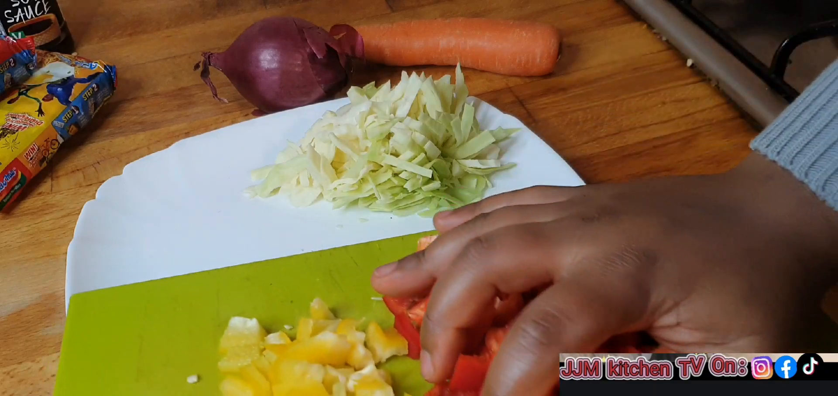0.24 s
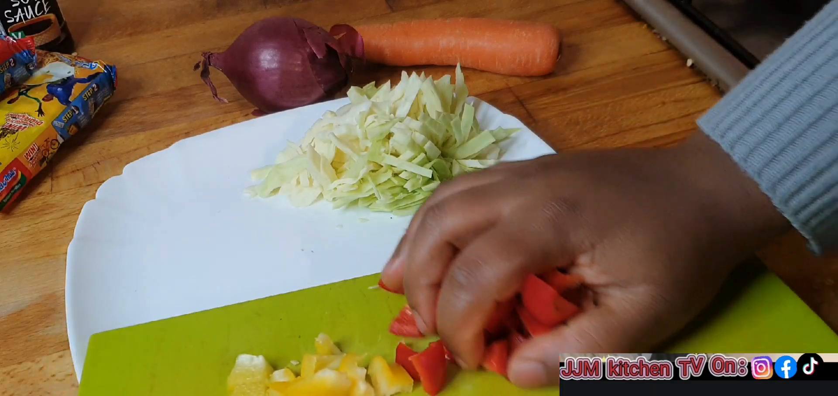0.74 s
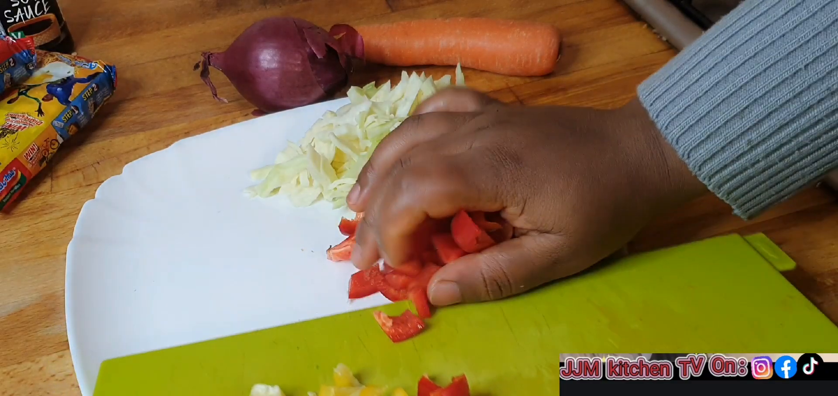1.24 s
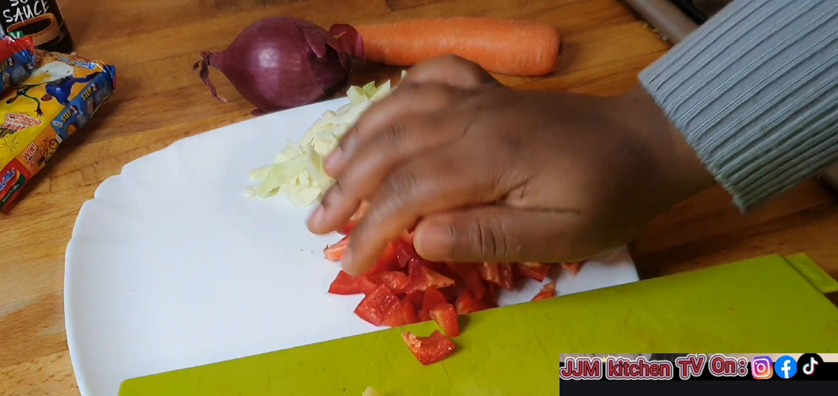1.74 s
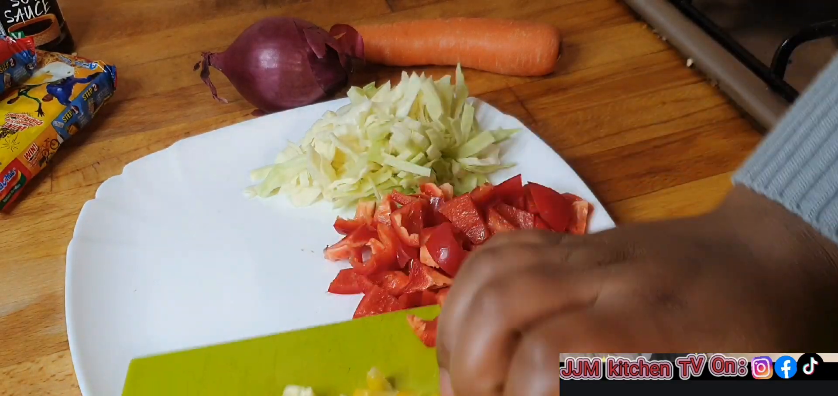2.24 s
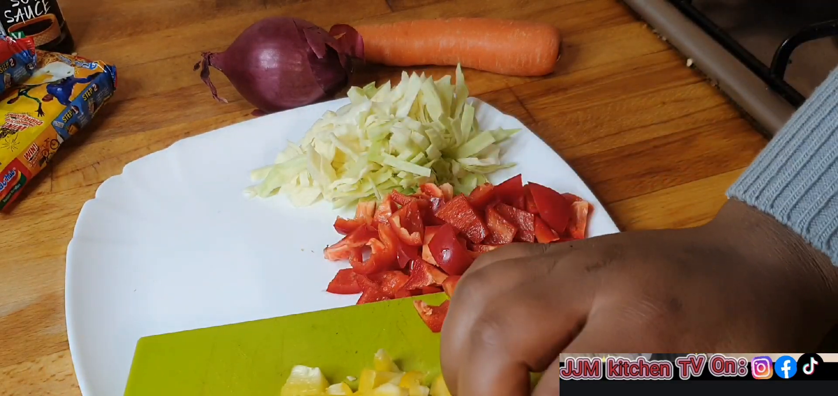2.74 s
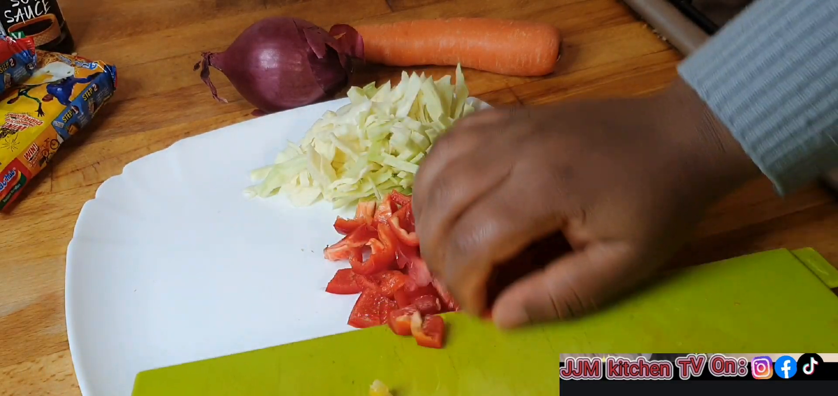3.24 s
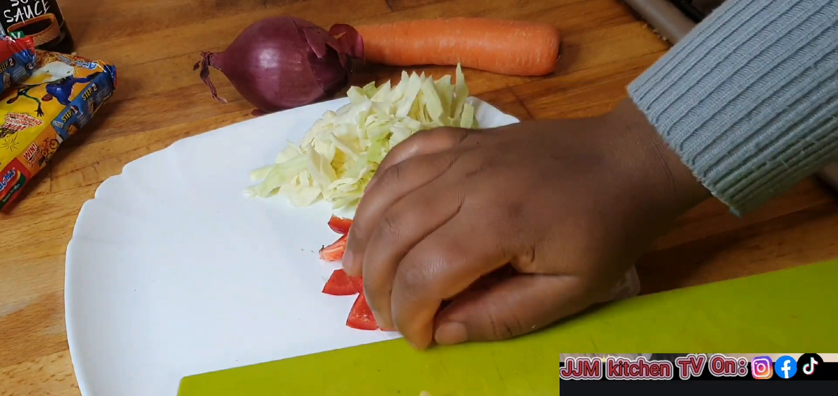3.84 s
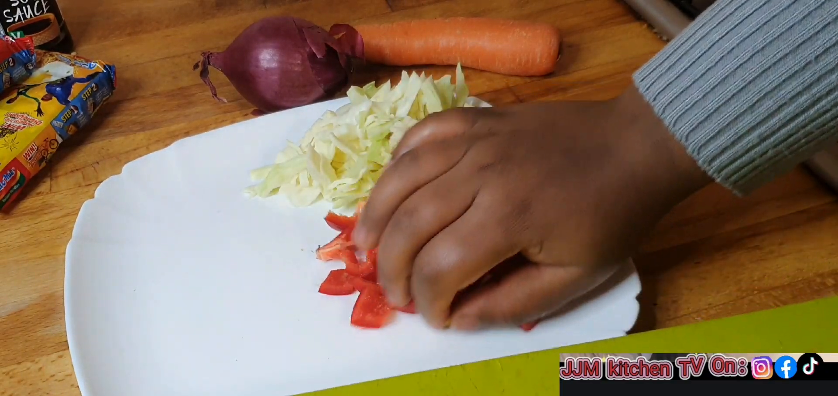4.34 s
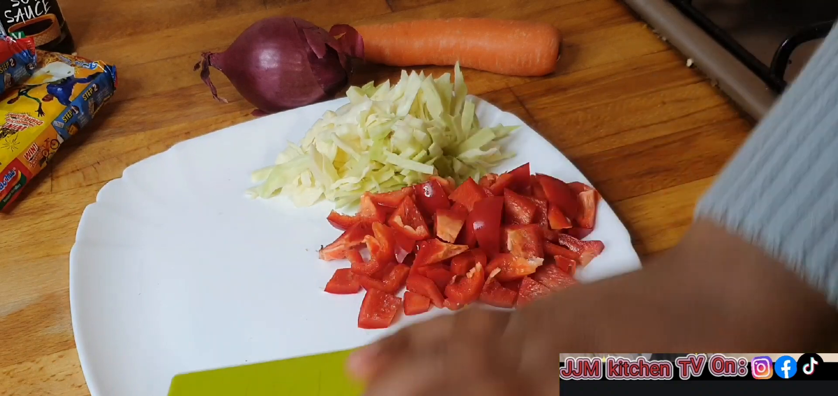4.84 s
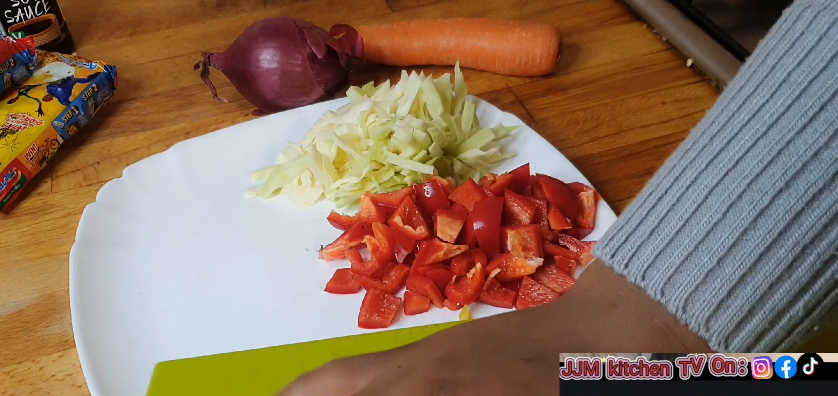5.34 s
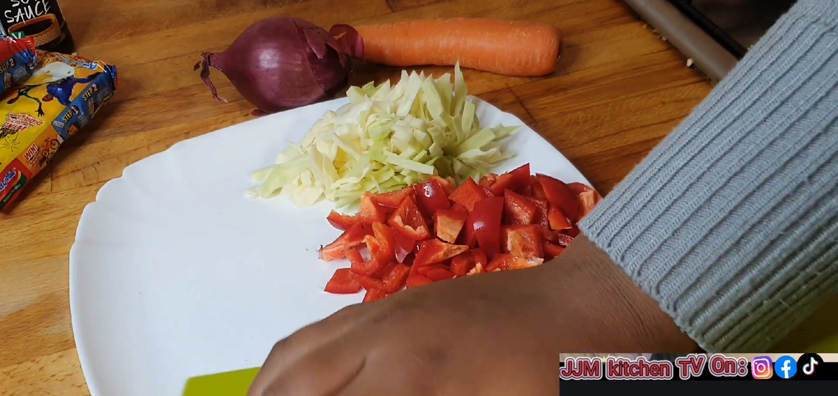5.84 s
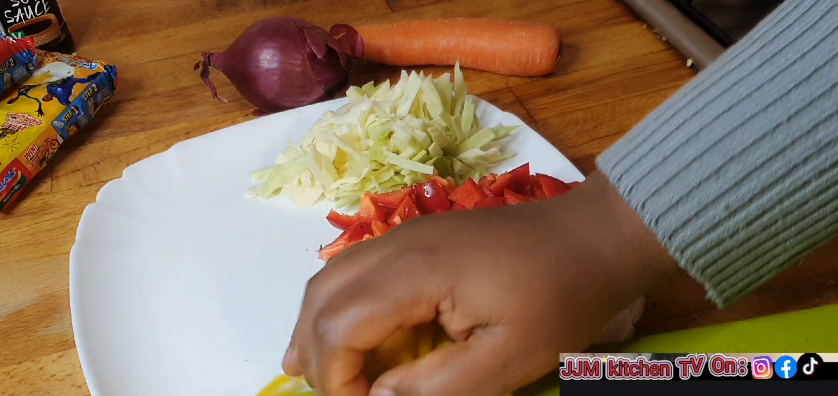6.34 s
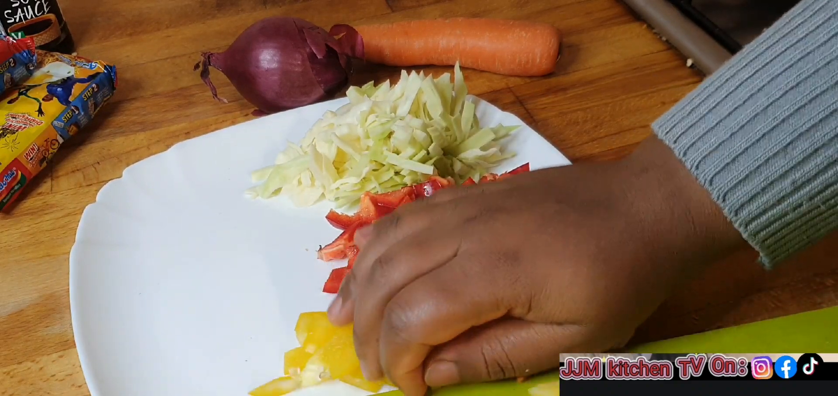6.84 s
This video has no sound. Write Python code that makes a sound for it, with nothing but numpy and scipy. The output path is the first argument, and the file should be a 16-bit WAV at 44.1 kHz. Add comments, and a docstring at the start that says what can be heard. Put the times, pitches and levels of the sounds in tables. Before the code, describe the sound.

Chopped wet peppers are scraped by hand off a thin plastic board onto a plate, with soft thuds, small clacks and sleeve rustle in a quiet kitchen.

```python
"""Under everything lies the still air of a small kitchen; brief rasps of skin, wool and wet pepper come and go.
A hand pushes chopped peppers off a thin plastic board onto a plate, on a wooden table: noise made of
slips and smooth rubbing. The board bends in slow damped sines and clacks on the plate, whose modes ring;
wet pieces pop, drop and are patted down. A knitted sleeve brushes past close to the microphone, and late
on its cuff bumps it. The work lies left of centre; the room's echoes are noise dying band by band."""
import sys
import numpy as np
from scipy import signal
from scipy.fft import rfft, irfft, next_fast_len
from scipy.io import wavfile

SR = 44100
rng = np.random.default_rng(int(sys.argv[2]) if len(sys.argv) > 2 else 0)


def wav_out(sig):
    """Save sig, one row per channel (or a flat mono array), as 16-bit PCM at SR to the path in sys.argv[1]."""
    wavfile.write(sys.argv[1], SR, np.round(np.clip(np.atleast_2d(sig).T, -1, 1) * 32767).astype(np.int16))


N = 313551
TIME = np.arange(N) / SR


def amp(db):
    """Amplitude factor of a level in dB."""
    return 10 ** (np.asarray(db) / 20)


def unit(x):
    """Scaled to rms 1."""
    return x / np.sqrt(np.mean(x ** 2) + 1e-20)


def read(points, hz):
    """A table's value on a log-frequency axis."""
    f, value = np.transpose(points)
    return np.interp(np.log(hz + 1), np.log(f + 1), value)


def add(mix, s, sound):
    """Mixes a sound in at s seconds, cut off at the end of the mix."""
    part = mix[:, max(round(s * SR), 0):][:, :sound.shape[-1]]
    part += sound[..., :part.shape[1]]


def colour(x, spectrum, size=4096):
    """Causal minimum-phase filter with the given spectrum."""
    hz = abs(np.fft.fftfreq(size, 1 / SR))
    log_gain = np.log(amp(read(spectrum, hz)))
    response = np.exp(np.conj(signal.hilbert(log_gain)))
    taps = np.fft.ifft(response).real[:size // 2]
    return signal.oaconvolve(x, taps[None], axes=1)[:, :x.shape[1]]


# likeness of the two microphone channels: (frequency [Hz], left-right correlation [1])
CHANNEL_LIKENESS = [(40, 1), (120, 0.94), (400, 0.77), (1000, 0.18), (2500, 0.034), (8000, 0.064)]


def paired(x):
    """Two unrelated channels become a microphone pair: alike in the bass, apart in the treble."""
    size = next_fast_len(x.shape[1])
    left, other = rfft(x, size)
    same = np.clip(read(CHANNEL_LIKENESS, np.fft.rfftfreq(size, 1 / SR)), -1, 1)
    right = same * left + np.sqrt(1 - same ** 2) * other
    return irfft(np.array([left, right]), size)[:, :x.shape[1]]


# the work lies to the left, which shows most in the treble: (frequency [Hz], left minus right [dB])
LEFT_LEAD = [(60, 2.5), (250, -0.7), (500, 2), (1000, 4.5), (2500, 4.5), (5000, 10.5), (12000, 2)]


def leftward(x):
    """Places a sound left of centre by a level difference that varies with frequency."""
    size = next_fast_len(N)
    half_db = read(LEFT_LEAD, np.fft.rfftfreq(size, 1 / SR)) / 2
    return irfft(rfft(x, size) * amp([half_db, -half_db]), size)[:, :N]


# spectrum of the still kitchen: (frequency [Hz], level [dB])
AIR_SPECTRUM = [(15, -28.5), (25, -10), (66, 1), (118, -17.5), (301, -14.5), (394, -23), (450, -17.5),
                (655, -26), (3440, -34), (7480, -42), (15000, -38)]


def still_air(level_db=-70.5):
    """The quiet of the kitchen is steady coloured noise."""
    noise = paired(rng.standard_normal((2, N)))
    return amp(level_db) * unit(colour(noise, AIR_SPECTRUM))


# short rasps of skin, wool and wet pepper; the width is that of one filter pass:
# (time [s], length [s], resonance [Hz], width [Hz], level [dB])
RASPS = [(0.161, 0.13, 930, 300, -78), (0.383, 0.19, 1630, 500, -70.5), (2.103, 0.15, 2960, 3000, -80),
         (2.441, 0.13, 6570, 1000, -84.5), (2.613, 0.32, 2390, 450, -73), (2.639, .26, 1670, 400, -75),
         (2.781, 0.032, 9000, 3000, -68.5), (3.049, 0.37, 1610, 880, -75.5),
         (5.37, 0.092, 6470, 2000, -73.5), (6.001, 0.14, 2850, 2500, -66), (6.031, 0.1, 300, 119, -50),
         (6.102, 0.013, 6070, 500, -57), (6.294, 0.19, 4560, 790, -73.5), (6.668, 0.21, 6080, 3500, -83.5),
         (6.791, 0.15, 516, 250, -70.5)]


def rasps():
    """Brief rubs, each hissing in one resonance: noise passed twice through a peak filter."""
    out = np.zeros((2, N))
    for s, length, hz, width, db in RASPS:
        noise = paired(rng.standard_normal((2, int(length * SR))))
        b, a = signal.iirpeak(hz, hz / width, fs=SR)
        band = signal.lfilter(b, a, signal.lfilter(b, a, noise))
        add(out, s, amp(db) * unit(band) * signal.windows.tukey(noise.shape[1], .7))
    return out


def swell(s, length, rise_db_per_s, arch_db, release_s):
    """Gain of one movement: a rise up to s, an arch over its length, then a fade to nothing."""
    along = np.clip((TIME - s) / length, 0, 1)
    fade = np.clip(1 - (TIME - s - length) / release_s, 0, 1)
    rise_db = -rise_db_per_s * np.maximum(s - TIME, 0)
    return fade * amp(rise_db - arch_db * (2 * along - 1) ** 2)


def friction(spectrum, slips_per_s, slip_share, uneven_db, catch_hz):
    """Separate slips over a smooth rub; the contact catches and lets go."""
    sizes = amp(3 * np.minimum(rng.exponential(1, N), 3)) * rng.choice([-1, 1], (2, N))
    slips = (rng.random(N) < slips_per_s / SR) * sizes
    share = np.clip(slip_share, 0, 1)
    smooth = rng.standard_normal((2, N))
    drive = np.sqrt(share) * unit(slips) + np.sqrt(1 - share) * smooth
    grip = np.interp(TIME * catch_hz, np.arange(2000), rng.standard_normal(2000))
    rub = colour(paired(drive), spectrum)
    return unit(rub * amp(uneven_db * grip))


# handfuls of pieces tumbling over: (time [s], length [s], level [dB])
TUMBLES = [(0.344, 0.65, -62.5), (2.725, 0.19, -61), (3.282, 0.67, -61), (4.29, 0.14, -61),
           (4.958, 0.049, -51), (5.474, 0.055, -54.5), (5.748, 0.042, -47), (6.023, 0.3, -47)]
# the fingers keep stirring the heap a little: (time [s], length [s], level [dB])
STIRRING = (0.7, 6.4, -71)


def tumble_gain(rise_db_per_s=152, arch_db=2.5, release_s=0.17):
    """Handfuls tumble over a faint steady stirring; their powers add."""
    power = 0
    for s, length, db in TUMBLES + [STIRRING]:
        power = power + (amp(db) * swell(s, length, rise_db_per_s, arch_db, release_s)) ** 2
    return np.sqrt(power)


# wet pieces sliding on the plastic: (frequency [Hz], level [dB])
SLIDE_SPECTRUM = [(300, -19.5), (650, -5), (1000, -2.5), (1700, -8), (2300, -25.5), (5000, -24.5),
                  (16000, -70)]
# pieces tumbling under the fingers: (frequency [Hz], level [dB])
SHUFFLE_SPECTRUM = [(25, -6), (55, 2), (110, 2.5), (180, 0.5), (280, 1.5), (380, -11), (455, -2),
                    (560, -12.5), (800, -25.5), (2000, -35.5), (16000, -77.5)]


def heap(slide, shuffle, slide_db=-2):
    """Wet pieces stick and slip on the plastic and tumble softly under the fingers."""
    sliding = friction(SLIDE_SPECTRUM, slips_per_s=500, slip_share=0.14, uneven_db=2.5, catch_hz=35.06)
    tumbling = friction(SHUFFLE_SPECTRUM, slips_per_s=160, slip_share=0.7, uneven_db=0.5, catch_hz=24)
    return amp(slide_db) * slide * sliding + shuffle * tumbling


# strokes of hand and sleeve across the board, the sliding before heap() trims it:
# (time [s], length [s], swish level [dB], fibre hiss level [dB], relative wet sliding level [dB])
STROKES = [(0.484, 0.48, -58, -65, -54.5), (1.22, 0.4, -79.5, -84.5, -85),
           (2.703, 0.13, -71.5, -80.5, -71.5), (2.89, 0.39, -79, -73, -64), (3.496, 1, -85.5, -90, -91),
           (4.977, 0.076, -64, -88.5, -69.5), (5.2, 0.23, -82.5, -85.5, -83),
           (5.485, .08, -75.5, -80.5, -67), (5.693, 0.1, -58.5, -69, -55), (5.929, 0.26, -56, -65, -57)]


def stroke_gains(rise_db_per_s=97, arch_db=3.5, release_s=0.26):
    """A stroke gathers speed, is fastest halfway and runs out; swish, hiss and sliding all follow it."""
    power = 0
    for s, length, *levels_db in STROKES:
        movement = swell(s, length, rise_db_per_s, arch_db, release_s)
        power = power + np.outer(amp(levels_db), movement) ** 2
    return np.sqrt(power)


# broad swish of wool and skin: (frequency [Hz], level [dB])
SWISH_SPECTRUM = [(300, -2), (900, -5), (1700, 3), (3000, 1.5), (5000, -4.5), (6800, -3.5), (7800, -19),
                  (11000, -20.5), (16000, -41.5)]
# hiss of single wool fibres: (frequency [Hz], level [dB])
FIBRE_SPECTRUM = [(3000, -22.5), (6500, -8.5), (8500, -4), (11000, -6), (15500, -12)]


def sleeve(swish, fibres, uneven_db=1.2):
    """Wool and skin brush along close by: a broad swish topped by the hiss of single fibres."""
    brush = friction(SWISH_SPECTRUM, slips_per_s=700, slip_share=0.19, uneven_db=uneven_db, catch_hz=45.6)
    hiss = friction(FIBRE_SPECTRUM, slips_per_s=3100, slip_share=0.22, uneven_db=uneven_db, catch_hz=44.6)
    return swish * brush + fibres * hiss


# the board flexing against the table; flutter is relative to the thud:
# (time [s], level [dB], pitch [Hz], flutter level [dB])
THUDS = [(0.552, -54, 44.4, -26), (1.054, -58, 50.8, -8), (1.546, -36.5, 55.75, -13),
         (2.11, -37.5, 56.8, -18), (2.667, -33, 43.24, -26), (3.368, -41, 47.2, -33),
         (4.011, -44, 46.5, -13.5), (4.64, -58.5, 67.2, -14), (4.891, -53.5, 86.7, -6),
         (5.282, -49.5, 74.9, -10), (5.718, -37, 70.8, -9.5), (6.29, -46, 55.9, -30),
         (6.964, -53, 59.7, -23.5), (7.071, -36.5, 62.82, -8.5)]
# bending modes of the board: (multiple of its pitch [1], level [dB])
BENDING_MODES = [(1, 5.5), (.72, -1.5), (1.4, -2.5), (1.85, -11)]


def thuds(flutter_low_hz=190, flutter_high_hz=280, swell_s=0.048, damping=1.442):
    """The board bends and swings back in slow cycles damped by the hand; its loose edge flutters on the table."""
    out, t = np.zeros((2, N)), np.arange(SR // 2) / SR
    flutter_spectrum = [(60, -20), (flutter_low_hz, -1), (flutter_high_hz, 0), (400, -15),
                        (750, -21), (1600, -36), (5000, -55), (16000, -75)]
    envelope = (t / swell_s) ** .7 * np.exp((1 - (t / swell_s) ** damping) / 2)
    for s, db, hz, flutter_db in THUDS:
        swing = sum(amp(mode_db) * np.sin(2 * np.pi * hz * k * t) for k, mode_db in BENDING_MODES)
        flutter = unit(colour(paired(rng.standard_normal((2, len(t)))), flutter_spectrum))
        add(out, s, amp(db) * envelope * (swing + amp(flutter_db) * flutter))
    return out


# how long each band of the small room echoes: (frequency [Hz], time to fall 60 dB [s])
ROOM_DECAY = [(100, 0.98), (400, 0.11), (1200, 0.28), (3000, 0.3), (7000, 0.32), (15000, 0.44)]


def kitchen(x, first_echo_s=0.0051):
    """The small room's echoes: noise after a short gap, each band dying at its own speed."""
    count = SR // 2
    taps = paired(rng.standard_normal((2, count))) * (np.arange(count) > first_echo_s * SR)
    hz, t, bands = signal.stft(taps, SR, nperseg=256)
    decay = amp(-60 * t / read(ROOM_DECAY, hz)[:, None])
    tail = signal.istft(bands * decay, SR, nperseg=256)[1]
    return signal.fftconvolve(x.mean(0)[None], tail / np.linalg.norm(tail[0]), axes=1)[:, :N]


# what plate, board and table ring with, before each spot varies the levels:
# (frequency [Hz], relative level [dB], time to fall 60 dB [s])
PLATE_MODES = [(262, -5, .18), (312, -3, .14), (451, 1, .28), (500, -5, .18), (603, -9, .2), (790, -9, .22),
               (954, -9, .18), (1050, -3, .045), (1385, -1, .07), (1666, -10, .2), (2008, -4, .07),
               (2386, -1, .11), (2642, -6, .1), (2766, -6, .1), (3166, -3, .16), (3337, -9, .15),
               (3490, -8, .16), (3997, -8, .14), (4790, -11, .15), (6480, -8, .13), (6700, -10, .13)]


def ring(t, spot_db=4.0):
    """Decaying sines of the plate's modes; each spot that is struck favours others."""
    hz, db, t60 = np.transpose(PLATE_MODES)[:, :, None]
    db = db + spot_db * rng.standard_normal(db.shape)
    phase = 2 * np.pi * rng.random((2, len(hz), 1))
    return (amp(db - 60 * t / t60) * np.sin(2 * np.pi * hz * t + phase)).sum(1)


# the board's edge clacking on the plate: (time [s], relative level [dB], weight near 400 Hz [dB])
CLACKS = [(0.63, -18, -22.5), (0.662, -28, -4.5), (0.668, -30, -9.5), (0.96, -41, -19.5),
          (1.049, -38.5, -29), (1.104, -42.5, -18), (4.963, -19, -9.5), (4.971, -30.5, -2.5),
          (5.917, -32.5, 0), (6.054, -34.5, -3.5), (6.111, -41, -13)]
# soft pieces dropping on the plate: (time [s], relative level [dB], weight near 400 Hz [dB])
DROPS = [(1.159, -49, -11), (1.517, -44, -1), (1.524, -37, -4.5), (2.423, -57, 1), (3.012, -41, 1),
         (3.259, -29.5, -8), (3.267, -34.5, -3.5), (3.513, -46, 4.5), (3.712, -42, -0.5), (3.856, -44, 10),
         (4.016, -33, 4), (4.255, -46, -4.5), (4.394, -43.5, -7), (4.457, -40.5, -15), (4.855, -39, -2),
         (4.923, -28, -8.5), (5.279, -51.5, 6), (7.097, -41, -6)]
# common colour of a blow: (frequency [Hz], level [dB])
BLOW_SPECTRUM = [(40, -15), (130, 3.5), (300, 0), (550, 1.5), (850, -2), (1350, -0.5), (1900, -5.5),
                 (2900, -1), (4200, -2), (6600, -8.5), (7300, -18.5), (11000, -35), (16000, -45)]
# harder blows are brighter: treble near 4 kHz at the full-blow level, and its rise per dB of level
FULL_BLOW_DB, EDGE_TREBLE_DB, PIECE_TREBLE_DB, BRIGHTEN_PER_DB = -18, -12, -26.5, 0.5


def knocks(contact_s=.0011, chatter_t60=.078, chatter_db=3, ring_db=-3, middle_db=-8, level_db=-27):
    """Each blow is a short crack, a brief chatter of plastic on china, and the ring of the plate."""
    out, t = np.zeros((2, N)), np.arange(SR // 2) / SR
    contact = t / contact_s * np.exp(1 - t / contact_s)
    blows = [(*row, EDGE_TREBLE_DB) for row in CLACKS] + [(*row, PIECE_TREBLE_DB) for row in DROPS]
    for s, db, weight_db, treble_db in blows:
        hard_db = treble_db + BRIGHTEN_PER_DB * (db - FULL_BLOW_DB)
        crack = rng.standard_normal(len(t)) * contact
        chatter = rng.standard_normal((2, len(t))) * amp(-60 * t / chatter_t60)
        after = amp(chatter_db) * unit(chatter) + amp(ring_db) * unit(ring(t))
        # the crack reaches both sides alike; what follows has bounced around the table
        blow = unit(crack) + paired(after) * (1 - np.exp(-t / contact_s))
        # soft pieces stay longer in contact and lose their treble
        softness = [(450, weight_db), (1000, middle_db), (1900, middle_db), (3600, hard_db),
                    (9000, 1.65 * hard_db)]
        coloured = colour(colour(blow, BLOW_SPECTRUM), softness)
        add(out, s, amp(db + level_db) * unit(coloured))
    return out


# wet pieces plopping onto the plate: (time [s], relative level [dB], pitch [Hz])
POPS = [(0.806, -32.5, 1230), (0.813, -31, 920), (0.926, -41, 816), (0.962, -37.5, 950),
        (1.027, -39.5, 940), (1.067, -37.5, 1140), (3.012, -41.5, 956)]


def pops(t60=0.02, rise_s=0.00065, overtone=1.51, overtone_db=-6, level_db=-3):
    """A wet piece plops onto the plate with a hollow pip of a few cycles."""
    out, t = np.zeros((2, N)), np.arange(SR // 20) / SR
    envelope = (1 - np.exp(-t / rise_s)) * amp(-60 * t / t60)
    for s, db, hz in POPS:
        pip = np.sin(2 * np.pi * hz * t) + amp(overtone_db) * np.sin(2 * np.pi * hz * overtone * t)
        add(out, s, amp(db + level_db) * envelope * pip)
    return out


# fingers pressing the wet heap on the plate: (time [s], length [s], level [dB])
PATS = [(1.195, 0.56, -82.5), (3.405, 0.12, -73.5), (3.613, 0.051, -77.5), (3.701, 0.053, -75.5),
        (3.84, 0.19, -82), (4.005, 0.083, -72.5), (4.416, 0.079, -73.5)]
# colour of a wet touch: (frequency [Hz], level [dB])
SQUISH_SPECTRUM = [(400, -25), (1200, 9.5), (2500, -20), (3200, -3), (6600, -1.5), (7600, -30),
                   (16000, -27)]


def pats(clicks_per_s=700, click_decay_s=0.0046, ring_db=-7):
    """Wet pieces part and touch with tiny clicks that set the plate ringing faintly."""
    out, t = np.zeros((2, N)), np.arange(SR // 5) / SR
    click = unit(rng.standard_normal((2, len(t))) * np.exp(-t / click_decay_s))
    touch = colour(click + amp(ring_db) * unit(ring(t)), SQUISH_SPECTRUM)
    for s, length, db in PATS:
        count = int(length * SR)
        clicks = (rng.random(count) < clicks_per_s / SR) * rng.standard_normal(count)
        clicks = clicks * signal.windows.tukey(count, .6)
        sound = signal.fftconvolve(clicks[None], touch, axes=1)
        # the level counts over the press itself, without the ring after it
        press_rms = np.sqrt(np.mean(sound[:, :count] ** 2) + 1e-20)
        add(out, s, amp(db) * sound / press_rms)
    return out


def cuff_bump(s=6.232, db=-23, hz=85, rise_s=0.0087, scuff_db=-17, scuff_t60=0.18, left_db=-20):
    """The cuff bumps the right side of the microphone: a low push and a dull scuff."""
    out, t = np.zeros((2, N)), np.arange(SR // 8) / SR
    push = np.sin(2 * np.pi * hz * t) * t / rise_s * np.exp(1 - t / rise_s)
    scuff_spectrum = [(100, -25), (280, 7.0), (800, -4), (3000, -36), (16000, -60)]
    scuff = unit(colour(rng.standard_normal((1, len(t))), scuff_spectrum))
    bump = push + amp(scuff_db - 60 * t / scuff_t60) * scuff
    add(out, s, amp(db) * bump * amp([[left_db], [0]]))
    return out


def scene(knock_room_db=-5, thud_room_db=-24):
    """All sources in the kitchen; only the blows, pops, pats and thuds feed the echoes."""
    air = still_air()
    swish, fibres, slide = stroke_gains()
    rubbing = rasps() + heap(slide, tumble_gain()) + sleeve(swish, fibres)
    bends = thuds()
    hits = knocks() + pops() + pats()
    room = kitchen(amp(knock_room_db) * hits + amp(thud_room_db) * bends)
    return leftward(hits + bends + room + rubbing) + cuff_bump() + air


def record(dry, low_cut_hz=32, fade_s=.004, edge_hz=15600):
    """The microphone loses the deepest bass; then a short closing fade and the band limit."""
    size = next_fast_len(N + SR, True)
    hz = np.fft.rfftfreq(size, 1 / SR)
    bass_loss = 1 - 1 / (1 + (hz / low_cut_hz) ** 8)
    thinned = irfft(rfft(dry, size) * bass_loss, size)[:, :N]
    faded = thinned * np.minimum(TIME[::-1] / fade_s, 1)
    band_limit = signal.firwin(511, edge_hz, window=("kaiser", 9), fs=SR)
    return signal.oaconvolve(faded, band_limit[None], "same")


dry = scene()
out = record(dry)
wav_out(out)
```